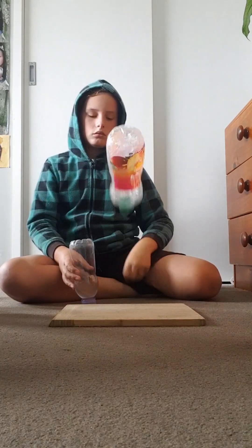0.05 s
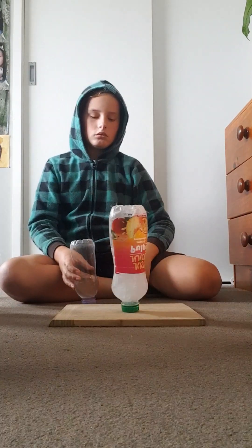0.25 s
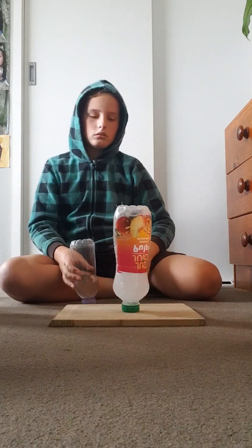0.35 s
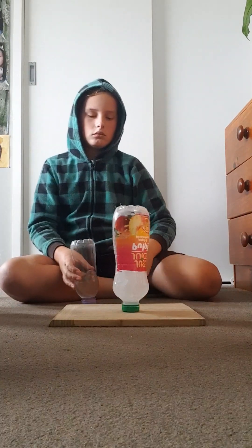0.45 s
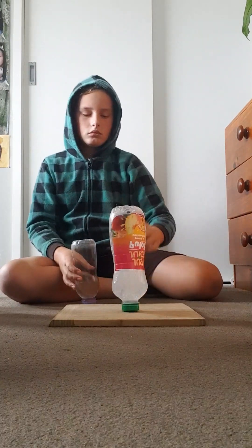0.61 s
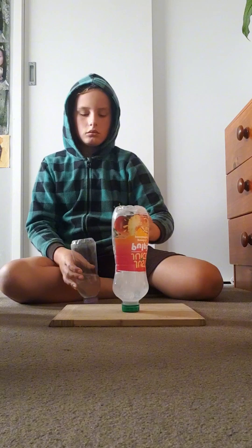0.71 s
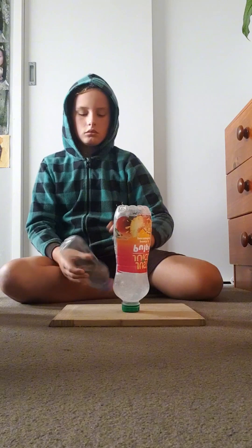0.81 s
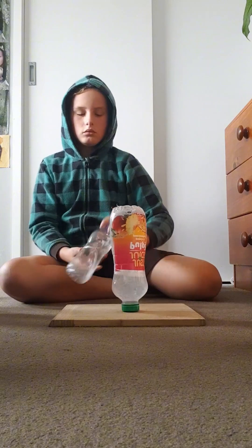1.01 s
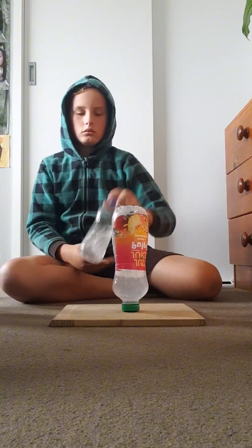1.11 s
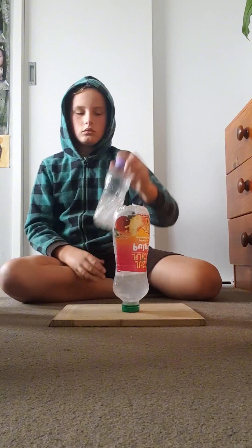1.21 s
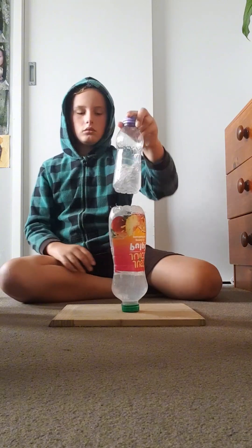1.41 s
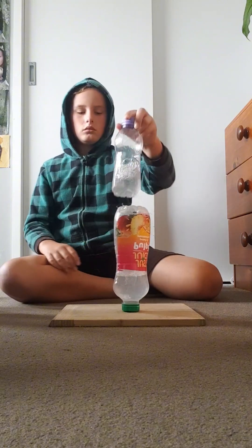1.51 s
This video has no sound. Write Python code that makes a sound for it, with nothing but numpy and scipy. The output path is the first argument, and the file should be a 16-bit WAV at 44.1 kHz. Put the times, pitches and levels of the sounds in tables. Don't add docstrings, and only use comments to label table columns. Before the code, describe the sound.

A part-filled plastic bottle lands cap first on a wooden board with one loud boomy knock

```python
import sys
import numpy as np
from scipy import signal
from scipy.fft import rfft, irfft
from scipy.io import wavfile

SR = 44100
rng = np.random.default_rng(int(sys.argv[2]) if len(sys.argv) > 2 else 0)


def store_wav(level_fs):
    pcm = np.round(np.clip(np.atleast_2d(level_fs), -1, 1) * 32767)
    wavfile.write(sys.argv[1], SR, pcm.T.astype(np.int16))


def how_loud(loudness_db):
    steps = np.asarray(loudness_db, float) / 20
    return 10 ** steps


N = 68355


def evened(x):
    return x / np.sqrt(np.mean(x ** 2) + 1e-20)


def read(points, hz):
    f, value = np.transpose(points)
    return np.interp(np.log(hz + 1), np.log(f + 1), value)


def level_over_time(points, *outside_db):
    s, db = np.transpose(points)
    return np.interp(np.arange(N) / SR, s, db, *outside_db)


def add(mix, s, sound):
    part = mix[round(s * SR):][:len(sound)]
    part += sound[:len(part)]


def coloured(x, points):
    hz = np.abs(np.fft.fftfreq(4096, 1 / SR))
    log_gain = np.log(how_loud(read([(20, -60)] + list(points), hz)))
    taps = np.fft.ifft(np.exp(np.conj(signal.hilbert(log_gain)))).real[:2048]
    return signal.oaconvolve(x, taps / np.linalg.norm(taps))[:len(x)]


def slow(top_hz):
    t = np.arange(N) / SR
    rates_hz = np.geomspace(.5, top_hz, 16)
    return evened(sum(np.sin(2 * np.pi * (f * t + rng.random())) / np.sqrt(f) for f in rates_hz))


def ring(hz, db, t60, rise):
    t = np.arange(SR // 2) / SR
    swell = (1 - np.exp(-t / rise)) ** 2
    return how_loud(db - 60 * t / t60) * swell * np.sin(2 * np.pi * hz * t)


LANDING_S = .2307
BLOW_DB, BLOW_S, BLOW_ROOM_HZ = -3, 0.00044, 450
TICK_DB, TICK_T60_S = -12, .008
CRACK_DB, CRACK_RISE_S, CRACK_T60_S = -13, .002, 0.037
BOARD_DB, BOARD_LAG_CYCLES = 0, .24
# pitch_hz, level_db (per Hz)
CRACK_COLOUR = [(200, 2), (600, -29), (1000, -18.5), (1600, -6.5), (2400, -4.5), (4800, -3), (9000, -13.5),
                (15800, -18)]
# delay_s, level_db
ECHOES = [(.0072, -11), (.0135, -6.5), (0.02, -17.5), (.027, -13), (.041, -24.5)]
# pitch_hz, level_db, t60_s, swell_cycles
BOARD_MODES = [(85.18, 3, 0.17, 1.3), (76, -13, 0.24, 3.7), (93.6, -28, 0.5, 1.4), (151.3, -21, 0.34, 1.2),
               (160.8, -5, 0.15, .4), (212, -8.5, 0.08, 1.8), (292, -20.5, 0.27, 2.5),
               (314, -7.5, .07, 0.27), (348.6, -8, 0.14, 1.4), (425, -16, 0.1, 1), (474.5, -16.5, .09, 2.3),
               (513.2, -18.5, 0.24, 1.4), (529, -13.5, 0.098, 1.6), (612, -16.5, 0.1, 0.57)]


def push():
    u = np.arange(SR // 4) / SR / BLOW_S
    return -how_loud(BLOW_DB) * np.sin(np.pi * u ** 0.41) * np.exp(-u * 0.2) * (u < 4.3)


def knock_sound():
    knock, blow = np.zeros(N), push()
    t = np.arange(len(blow)) / SR
    tick = how_loud(TICK_DB - 60 * t / TICK_T60_S) * np.diff(rng.standard_normal(len(t) + 1))
    add(knock, LANDING_S, blow + tick)
    return knock


def crack_sound():
    hit, blow = np.zeros(N), push()
    t = np.arange(len(blow)) / SR
    high_pass = signal.butter(2, BLOW_ROOM_HZ, "high", fs=SR, output="sos")
    add(hit, LANDING_S, how_loud(-2.0) * signal.sosfilt(high_pass, blow))
    shape = how_loud(CRACK_DB - 60 * t / CRACK_T60_S) * (1 - np.exp(-t / CRACK_RISE_S))
    for delay, db in [(0, 0.013)] + ECHOES:
        noise = coloured(rng.standard_normal(len(t)), CRACK_COLOUR)
        add(hit, LANDING_S + delay, how_loud(db) * shape * noise)
    return hit


def board_boom():
    modes = np.zeros(N)
    for hz, db, t60, swell in BOARD_MODES:
        add(modes, LANDING_S + BOARD_LAG_CYCLES / hz, ring(hz, db + BOARD_DB, t60, swell / hz))
    return modes


DROPS_PER_S, DROP_SPREAD_DB = 2800, 2


def patter(effort, colour):
    sizes = how_loud(DROP_SPREAD_DB * np.minimum(rng.exponential(1, N), 4))
    drops = sizes * (rng.random(N) < DROPS_PER_S / SR)
    drops = evened(coloured(drops * rng.standard_normal(N), colour))
    return drops * how_loud(level_over_time(effort, -120, -120) + 2.5)


# start_s, level_db
THROW = [
    (0.0, -60.5),
    (0.026, -79.5),
    (0.038, -43),
    (0.114, -60),
    (0.128, -53.5),
    (0.215, -85.5),
]
# pitch_hz, level_db (per Hz)
THROW_COLOUR = [(300, -3.5), (700, -8), (1300, -6), (2500, -4.5), (5000, -7.5), (8000, -2), (12000, -4.5),
                (15800, -7.5)]
# start_s, level_db
LIFT = [
    (0.9, -84),
    (0.952, -93),
    (0.982, -79),
    (1.178, -61),
    (1.21, -62),
    (1.238, -63.5),
    (1.276, -73.5),
    (1.44, -93.5),
    (1.5, -83),
]
# pitch_hz, level_db (per Hz)
LIFT_COLOUR = [(400, -16), (800, -9), (1200, -2.5), (1700, -6.5), (2500, -4), (4500, -9.5), (8000, -13),
               (15800, -11.5)]


def slosh():
    return patter(THROW, THROW_COLOUR) + patter(LIFT, LIFT_COLOUR)


GLUG_SKEW = .7
# start_s, start_hz, end_hz, level_db, length_s
GLUGS = [(.042, 1455, 788, -44.5, 0.01), (.053, 570, 558, -53.5, 0.033), (.07, 1070, 1050, -59, .02),
         (.072, 3400, 3280, -68, 0.017), (.262, 2377, 2336, -40.5, 0.027), (.297, 2300, 2324, -43.5, 0.028),
         (.33, 2400, 2378, -50, 0.023), (.295, 512, 521, -31.5, 0.019), (1.112, 3200, 3300, -63, 0.0089),
         (1.128, 3700, 3800, -60, .008), (1.14, 4100, 4000, -59.5, .01), (1.145, 2600, 2550, -69, .012),
         (1.167, 1300, 1250, -58, .01), (1.177, 1186, 1080, -58.5, 0.012), (1.168, 2630, 2616, -62, 0.023),
         (1.191, 2660, 2410, -68, 0.0071), (1.218, 837, 1620, -57.5, 0.0074),
         (1.232, 3150, 3100, -69, 0.0044), (1.232, 4170, 3960, -55, 0.0034), (1.233, 1940, 2030, -57, .01),
         (1.234, 1150, 990, -59, 0.0043), (1.244, 2065, 2150, -62, 0.021), (1.25, 2540, 2730, -62, .014)]


def glugs():
    out = np.zeros(N)
    for s, start_hz, end_hz, db, length in GLUGS:
        u = np.arange(0, length, 1 / SR) / length
        turns = np.cumsum(start_hz + (end_hz - start_hz) * u) / SR
        add(out, s, how_loud(db) * np.sin(np.pi * u ** GLUG_SKEW) * np.sin(2 * np.pi * turns))
    return out


KNOCK_SPAN_S = .02
# start_s, pitch_hz
TAP_TIMES = [(.037, 5000), (.044, 1200), (.054, 600), (.073, 3300), (.115, 11000), (.924, 5000),
             (.926, 600), (.946, 1300), (1.112, 11000), (1.166, 1250), (1.168, 2620), (1.219, 1150),
             (1.2325, 3000), (1.238, 2050), (.231, 1050), (.233, 2400), (.2425, 4900), (.2435, 11000),
             (.125, 2200)]
# level_db, width_hz, t60_s
TAP_SHAPES = [(-46, 8100, 0.067), (-48.5, 900, 0.03), (-57.5, 660, 0.038), (-51.5, 1000, 0.026),
              (-51.5, 7800, 0.07), (-72, 15000, 0.093), (-67.5, 1140, 0.31), (-64, 550, 0.086),
              (-56, 9000, 0.02), (-61.5, 1100, 0.11), (-71, 720, 0.16), (-62, 650, 0.067),
              (-47.5, 3000, 0.012), (-67, 800, 0.083), (-25, 460, .04), (-40, 150, 0.22),
              (-25.5, 2400, .03), (-27, 4000, .02), (-59, 2800, .1)]


def wall_taps():
    taps, cracks = np.zeros((2, N))
    t = np.arange(SR // 4) / SR
    for (s, hz), (db, width_hz, t60) in zip(TAP_TIMES, TAP_SHAPES):
        r = np.exp(-np.pi * width_hz / SR)
        fuzz = signal.lfilter([1], [1, -2 * r, r * r], rng.standard_normal((2, len(t))))
        tone = fuzz[0] * np.cos(2 * np.pi * hz * t) + fuzz[1] * np.sin(2 * np.pi * hz * t)
        tone = signal.lfilter([1, -2, 1], [1, -1.8, .81], tone)
        fade = how_loud(db - 60 * t / t60) * np.minimum(t / (.04 * t60), 1)
        at_landing = abs(s - LANDING_S) < KNOCK_SPAN_S
        add(cracks if at_landing else taps, s, evened(tone) * fade)
    return taps, cracks


# start_s, level_db
SLEEVE = [
    (.92, -75),
    (.95, -72.5),
    (1.0, -76),
    (1.07, -70.5),
    (1.11, -61.5),
    (1.15, -69),
    (1.19, -101),
    (1.45, -91.5),
    (1.5, -89),
]
# pitch_hz, level_db (per Hz)
SLEEVE_COLOUR = [(1500, -20), (3000, -8), (4300, 1.5), (5800, -4), (9000, 1), (12000, 0), (15800, -8)]


def sleeve():
    return patter(SLEEVE, SLEEVE_COLOUR)


# start_s, level_db (peak), pitch_hz, rise_s, t60_s
THUDS = [(.048, -51, 232, .012, .13), (.04, -52, 92, .015, .3), (.05, -66, 290, .01, .4),
         (.919, -60, 280, .003, .07), (.92, -68, 170, .005, .12), (1.366, -62, 270, .004, .07),
         (1.39, -55, 183, .03, .22), (1.37, -60, 126, .02, .3), (1.41, -65, 243, .015, .2),
         (1.39, -73, 350, .02, .3), (1.39, -63, 205, .012, .12), (1.49, -68, 190, .012, .15)]


def floor_thuds():
    thuds = np.zeros(N)
    for s, db, hz, rise, t60 in THUDS:
        thud = ring(hz, 0, t60, rise)
        add(thuds, s, how_loud(db) * thud / abs(thud).max())
    return thuds


HUM_HZ, HUM_WAVER_HZ, HUM_DB, HUM_WAVER_DB = 43.5, 0.47, -54, -1.3
GROWL_HZ, GROWL_WIDTH_HZ = 82, 11
# start_s, level_db
GROWL = [(0.56, -57), (0.638, -73), (0.666, -63.5), (0.808, -54), (0.883, -65), (1.064, -55.5), (1.14, -93),
         (1.218, -69), (1.255, -58), (1.314, -65), (1.344, -64), (1.369, -61.5), (1.466, -71), (1.55, -60)]


def hum():
    hum_turns = np.cumsum(HUM_HZ + HUM_WAVER_HZ * slow(5)) / SR
    tone = np.sin(2 * np.pi * hum_turns) * how_loud(HUM_DB + 3.5 + HUM_WAVER_DB * slow(9))
    growl_turns = np.cumsum(GROWL_HZ + GROWL_WIDTH_HZ * slow(23)) / SR
    return tone + how_loud(level_over_time(GROWL) + 3.5) * np.sin(2 * np.pi * growl_turns)


AIR_DB = -59
# pitch_hz, level_db (per Hz)
AIR_COLOUR = [(30, -9), (60, -3), (125, -9.5), (170, -16), (300, -22.5), (600, -33),
              (700, -33.5), (1050, -27), (1500, -36.5), (3000, -45.5), (4200, -39.5), (8000, -41),
            (12000, -28), (15800, -21.5)]
# pitch_hz, share
LIKENESS = [(60, 0.93), (180, 0.81), (550, 0.33), (1200, 0.052), (15000, 0.032)]


def likeness(hz):
    return np.clip(read(LIKENESS, hz), 0, 1)


def air():
    hz = np.fft.rfftfreq(N, 1 / SR)
    a, b = rfft(rng.standard_normal((2, N)))
    same = likeness(hz)
    pair = np.array([a, same * a + np.sqrt(1 - same ** 2) * b])
    return how_loud(AIR_DB) * evened(irfft(pair * how_loud(read(AIR_COLOUR, hz)), N))


ROOM_DB = 2.5
# pitch_hz, t60_s
ROOM_DECAY = [(100, .34), (300, .33), (700, .3), (1400, .25), (2400, .29), (6000, .26), (12000, .2)]


def room(x, dry_db=0.0):
    out = how_loud(dry_db) * np.array([x, x])
    turn = np.arange(N) * 2 * np.pi * 60 / SR
    for k in range(3):
        taps = np.zeros((2, SR // 2))
        at = np.arange(60, SR // 2 - 10, 10) + rng.integers(0, 10, (2, (SR // 2 - 61) // 10))
        np.put_along_axis(taps, at, rng.choice([-1., 1.], at.shape), 1)
        hz, t, z = signal.stft(taps, SR, nperseg=512)
        same = likeness(hz / 2)[:, None]
        z = np.array([z[0], same * z[0] + np.sqrt(1 - same ** 2) * z[1]])
        tail = signal.istft(z * how_loud(-60 * t / read(ROOM_DECAY, hz)[:, None]), SR, nperseg=512)[1]
        tail = tail / np.linalg.norm(tail[0])
        share = np.sqrt(2 / 3) * np.cos(turn + k * np.pi / 3)
        out += how_loud(ROOM_DB) * signal.fftconvolve((x * share)[None], tail, axes=1)[:, :N]
    return out


def ports(pair, balance, lead):
    pair = np.pad(pair * np.ones((2, 1)), ((0, 0), (N // 2, N - N // 2)), "reflect")
    hz = np.fft.rfftfreq(2 * N, 1 / SR)
    half = read(balance, hz) / 2
    gains = [how_loud(half), how_loud(-half) * np.exp(-2j * np.pi * hz * lead)]
    return irfft(rfft(pair) * gains)[:, N // 2:N // 2 + N]


DRY_DB, TAP_ROOM_DB, KNOCK_ROOM_DB, GLUG_ROOM_DB = -8.5, -7, -4, -7
LEFT_LEAD_S, BOARD_LEAD_S, KNOCK_LEAD_S = .00016, .00025, .00002
# pitch_hz, level_db (left minus right)
NEAR_BALANCE = [(60, -4.5), (150, -3), (380, -4.5), (800, -6), (2380, 1), (5000, -3), (9000, 10),
                (15000, 9)]
# pitch_hz, level_db (left minus right)
AIR_BALANCE = [(60, -1), (240, -3), (950, -11.5), (3770, 0.5), (15000, -0.5)]


def scene():
    knock, modes = knock_sound(), board_boom()
    taps, cracks = wall_taps()
    notes = glugs()
    sent = crack_sound() + slosh() + sleeve()
    sent = sent + how_loud(TAP_ROOM_DB) * taps + how_loud(KNOCK_ROOM_DB) * cracks + how_loud(GLUG_ROOM_DB) * notes
    near = ports(room(sent, DRY_DB) + floor_thuds(), NEAR_BALANCE, LEFT_LEAD_S)
    struck = ports(knock + cracks + taps + notes, NEAR_BALANCE, KNOCK_LEAD_S)
    boom = ports(modes, NEAR_BALANCE, BOARD_LEAD_S)
    return near + struck + boom + ports(air() + hum(), AIR_BALANCE, LEFT_LEAD_S)


def low_pass(x):
    return signal.sosfilt(signal.butter(12, 16260, fs=SR, output="sos"), x)


SELF_NOISE_DB, FADE_S, EDGE_HZ = -99, .012, 15760
# pitch_hz, level_db
MIC_COLOUR = [(28, -21), (42, 1), (5200, 0), (6500, -7.5), (7900, -23), (9200, -13.5), (11500, -10.5),
              (15800, -18.5)]


def record(dry):
    hz = np.abs(np.fft.fftfreq(4096, 1 / SR))
    gain = np.sqrt(np.mean(how_loud(2 * read([(20, -60)] + MIC_COLOUR, hz))))
    heard = gain * np.array([coloured(port, MIC_COLOUR) for port in dry])
    heard = heard + how_loud(SELF_NOISE_DB) * np.diff(rng.standard_normal((2, N + 2)), 2)
    left_s = np.arange(N)[::-1] / SR
    heard = heard * np.sin(np.pi / 2 * np.minimum(left_s / FADE_S, 1))
    heard = heard / (1 + heard ** 8) ** (1 / 8)
    band_edge = signal.firwin(2047, EDGE_HZ, window=("kaiser", 9), fs=SR)
    heard = signal.oaconvolve(heard, band_edge[None], "same")
    return low_pass(heard)


dry = scene()
out = record(dry)
store_wav(out)
```